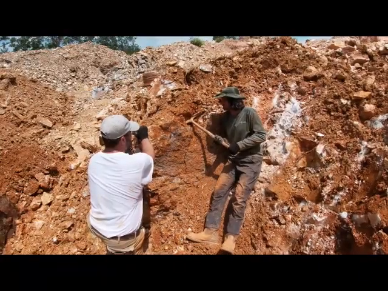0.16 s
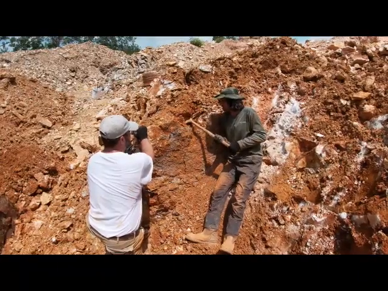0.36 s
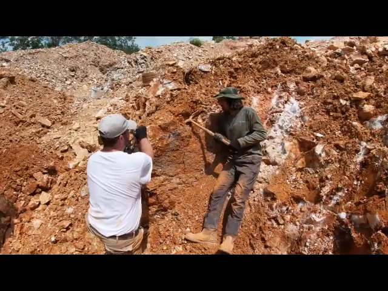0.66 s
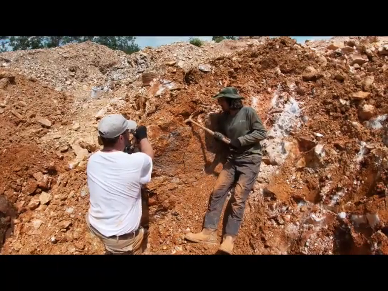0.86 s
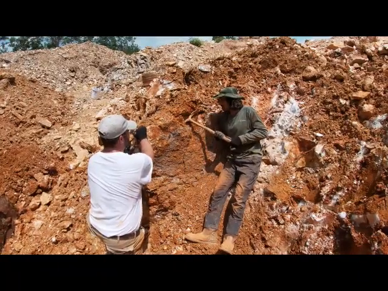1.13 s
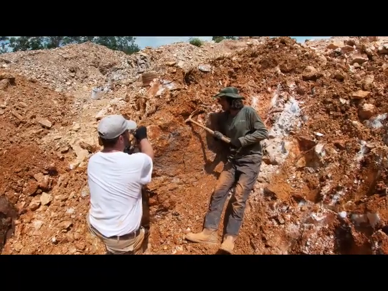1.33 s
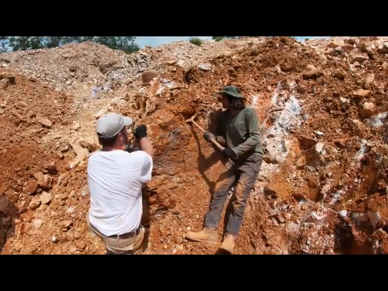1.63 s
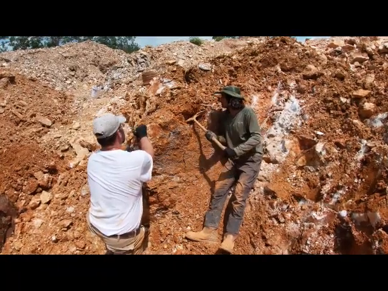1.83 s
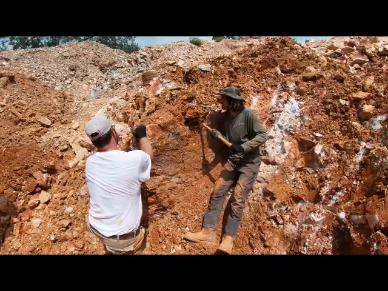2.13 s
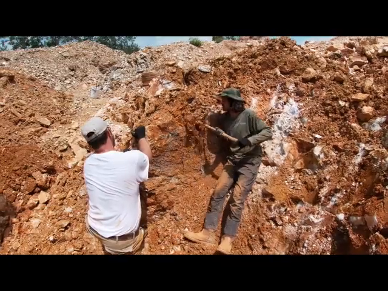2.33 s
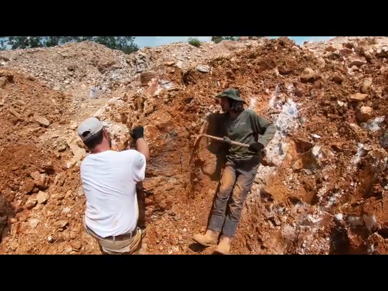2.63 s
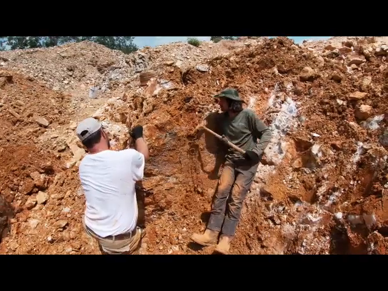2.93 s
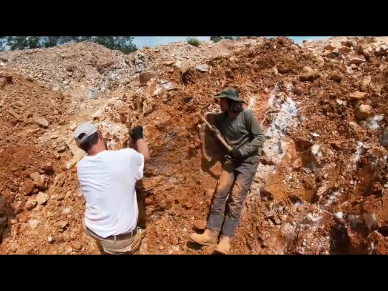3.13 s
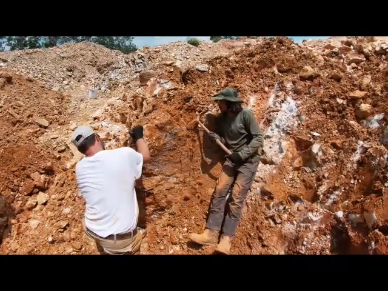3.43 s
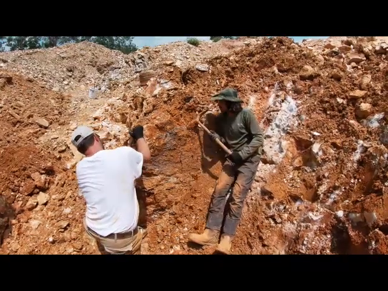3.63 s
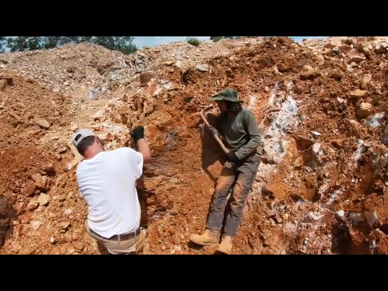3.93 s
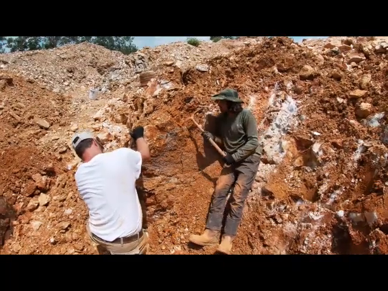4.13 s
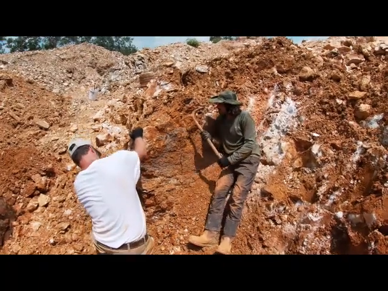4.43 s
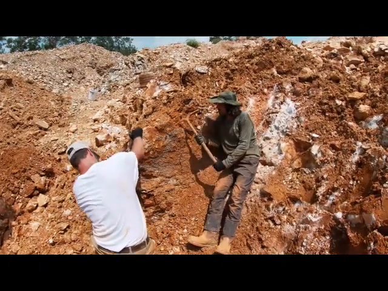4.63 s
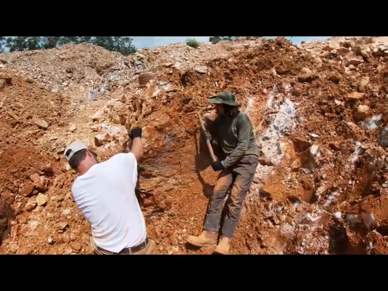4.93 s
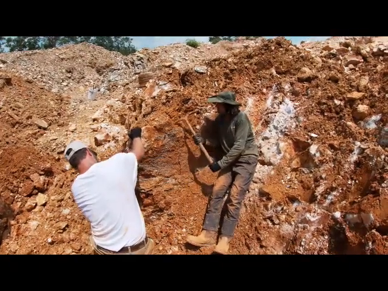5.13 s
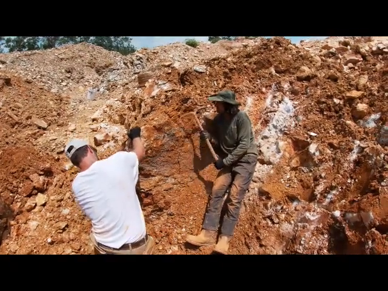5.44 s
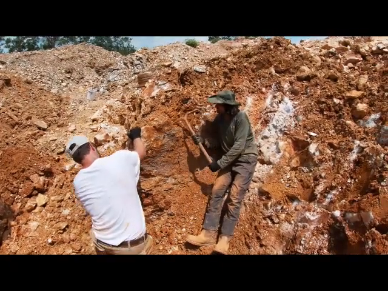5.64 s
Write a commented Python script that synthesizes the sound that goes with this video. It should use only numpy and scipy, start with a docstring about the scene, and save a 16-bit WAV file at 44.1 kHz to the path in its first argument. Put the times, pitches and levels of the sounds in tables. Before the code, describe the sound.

Quiet crumbling and ticking earth gives way to gritty scraping and a handful of hard, crunchy pick blows on rock outdoors.

```python
"""Digging in an open pit

Two people work a bank of clay and rock, one microphone feeding both channels alike.
A hand pick pries and scrapes, clods and stone chips break off, crumbs trickle: banded, ringing grains.
Hammer blows bite the rock, some close together: a burst of fractures and a short swell at 230 Hz.
Rough walls scatter the tool sounds; behind lies a low outdoor rumble with a faint hum.
"""
import sys
import numpy as np
from scipy import signal
from scipy.fft import rfft, irfft
from scipy.io import wavfile

SR = 44100
rng = np.random.default_rng(int(sys.argv[2]) if len(sys.argv) > 2 else 0)


def wav_out(sig):
    """Save sig, one row per channel (or a flat mono array), as 16-bit PCM at SR to the path in sys.argv[1]."""
    wavfile.write(sys.argv[1], SR, np.round(np.clip(np.atleast_2d(sig).T, -1, 1) * 32767).astype(np.int16))


N = 255188
TIME = np.arange(N) / SR

# Levels are those before the struck body's colour, the scatter and the microphone.
# heavy blows: t/s, rise/s, bite length/s, knock level/dB, crunch level/dB, grit level/dB,
# thud level/dB, ring f/Hz, ring level/dB
BLOWS = [(1.9757, 0.00038, 0.0066, -36, -27, -44, -56, 580, -25),
         (2.4161, 0.00015, .0075, -34.5, -37.5, -39.5, -50, 3190, -32.5),
         (2.4385, 0.00067, 0.017, -38, -37.5, -41, -41, 2830, -37),
         (3.4167, 0.00047, 0.0048, -23, -23.5, -22.5, -27, 3450, -21.5),
         (3.985, 0.00022, 0.0057, -24, -23.5, -23.5, -21, 2800, -30),
         (4.021, .002, 0.0081, -25.5, -23, -34.5, -34.5, 1830, -26),
         (4.4568, 0.0075, 0.02, -35, -29.5, -30, -30, 3140, -38.5),
         (5, 0.0032, 0.0072, -35.5, -37.5, -37.5, -47, 4750, -36),
         (5.0094, 0.00024, 0.0069, -19, -20, -26, -18.5, 1750, -48),
         (5.0305, 0.0016, .013, -25, -25, -26.5, -23, 2000, -30),
         (5.593, 0.00041, 0.026, -25, -21, -25.5, -22.5, 1730, -35)]
# knock, crunch and grit of a blow: low f/Hz, high f/Hz
BLOW_BANDS = [(270, 820), (1050, 3450), (3500, 9560)]
# peaks and hollows of struck rock and tool: f/Hz, width/Hz, level/dB
STRUCK_BODY = [(444.5, 160, 0), (675, 62, -6), (882, 81, 0), (1060, 180, 5.5), (1345, 41, -1),
               (1704, 150, 5.5), (2070, 43, 2), (3650, 350, 0), (4820, 610, 2), (5310, 2200, 6.5),
               (6490, 1200, 1), (7800, 960, 4)]
# what tool and struck rock ring with: f/Hz, relative level/dB, t60/s
TOOL_MODES = [(906, -7.5, 0.045), (1054, -38, 0.059), (1640, -33.5, 0.049), (2295, -43, 0.13),
              (2485, -15.5, .11), (3030, -50, .05), (3670, -41.5, .07), (5300, -46, .09), (5320, -32, .1),
              (7500, -27.5, .1)]

# pulls of the pick through packed clay, the first a light levering:
# t/s, length/s, wooden groan level/dB, steel singing level/dB
PULLS = [(1.691, 0.4, -94, -60), (1.992, 0.044, -36, -39.5), (2.123, 0.097, -38.5, -46.5),
         (2.281, 0.042, -39, -45.5)]
# resonances of the dragged pick, handle and head: f/Hz, relative level/dB, t60/s
PICK_WOOD = [(382, -14, 0.055), (557, 7, 0.09), (607, 5, 0.038)]
PICK_STEEL = [(1272, -1, 0.092), (1616, 3.5, 0.089), (2620, -3, 0.065), (2710, -12, 0.017),
              (3550, -2.5, 0.045)]
PULL_ATTACK_S, PULL_RELEASE_T60_S = 0.025, 0.087
SLIPS_PER_S, SLIP_DB = 160, 2  # the pick catches and slips as it is pulled
RASP_BAND_HZ, RASP_DB = [1150, 3200], -18  # bare grit against the groan of the handle

# steel scrapes over stone: t/s, length/s, level/dB
SCRAPES = [(0.877, 0.01, -55), (0.952, 0.02, -49.5), (1.905, 0.008, -42), (1.931, 0.022, -38.5),
           (2.101, 0.0072, -43), (2.202, 0.014, -45), (2.231, 0.017, -45.5), (2.373, 0.0087, -44.5),
           (2.406, 0.0047, -37), (2.489, 0.0051, -43), (2.716, 0.029, -41), (2.761, 0.0083, -35.5),
           (2.865, .013, -53), (2.97, 0.015, -43), (3.536, .02, -48.5), (4.052, 0.0081, -40.5)]
# balance of a scrape, added to its level: knock, crunch, grit [level/dB]
SCRAPE_COLOUR_DB = [-7.5, 1.5, 0]
# the steel edge sings as it scrapes: f/Hz, level against the scrape/dB, t60/s
EDGE_MODES = [(3300, -9.5, 0.0039), (9200, -16, .006), (10100, -17, .006)]
# clods and stone chips break off or land:
# t/s, length/s, knock level/dB, dullness/dB lost from each band to the next (negative is bright)
CLODS_AND_CHIPS = [(0.054, 0.029, -42.5, 1), (0.167, 0.073, -50.5, -1), (0.263, 0.028, -46, 2.5),
                   (0.371, .009, -36, -2), (0.439, 0.015, -46, 14), (0.693, 0.0095, -50.5, 1),
                   (1.544, 0.023, -40, 10), (1.994, 0.035, -34.5, 2.5), (2.05, 0.037, -41, 2.5),
                   (2.175, 0.011, -33, 11), (2.266, .008, -38, 0.5), (2.275, 0.014, -31.5, 3),
                   (3.079, 0.0076, -39, 4), (3.1, 0.0041, -40.5, 1.5), (3.129, 0.037, -33.5, 8.5),
                   (3.275, 0.011, -46, 5), (3.359, .01, -61, -9.5), (3.49, .01, -41, -1),
                   (4.727, 0.028, -49, 5.5)]
# pebbles tick against rock: t/s, level/dB
PEBBLES = [(0.461, -44), (.605, -50), (.733, -45.5), (1.093, -44.5), (2.631, -42.5), (3.008, -48),
           (3.051, -46), (3.342, -48.5), (3.776, -48), (3.843, -47), (4.132, -39.5), (5.323, -54.5)]
PEBBLE_S, PEBBLE_COLOUR_DB = 0.0017, [-10.5, -3, 5]  # contact length; knock, crunch, grit
# knock, crunch and grit of small pieces: low f/Hz, high f/Hz
CRUMBLE_BANDS = [(200, 1005), (950, 2700), (3400, 9700)]
# how each kind of contact swells and dies: (rise in lengths, t60 in lengths, before a fixed tail)
SCRAPE_SHAPE, CLOD_SHAPE, PEBBLE_SHAPE = (0.28, 2.2), (0.23, 3.55), (0.09, 7.5)

# soft hollow bumps: t/s, length/s, start f/Hz, level/dB before the flutter
BUMPS = [(.069, 0.042, 233, -40.5), (.26, 0.031, 165, -48), (.45, 0.043, 177, -44), (1.315, .06, 325, -39),
         (2.835, 0.025, 249, -46.5), (3.327, 0.018, 185, -36.5), (4.611, 0.022, 370, -51.5),
         (4.745, .11, 228, -46.5)]
BUMP_SAG, BUMP_ROUGHNESS = 0.2, 0.88  # share of pitch lost over a bump's length; flutter depth

# uneven flow of dirt down the bank: t/s, level/dB
FLOW = [(0, -52), (0.22, -53.5), (0.5, -57), (0.68, -51), (0.82, -58), (0.98, -49), (1.09, -59.5),
        (1.125, -71), (1.22, -64), (1.43, -52.5), (1.68, -61), (1.85, -57), (2.07, -54), (2.16, -59),
        (2.5, -57), (2.85, -54.5), (3.28, -60), (3.58, -52.5), (3.76, -63.5), (4.1, -64.5), (4.3, -70.5),
        (4.75, -66.5), (5.4, -74.5), (5.79, -62.5)]
# spectra of sliding sand and tumbling crumbs: f/Hz, relative level/dB
SAND = [(700, -10.5), (1500, -1), (3500, -2), (5500, -2.5), (7800, -3), (8800, -6), (10000, -5),
        (11500, -13.5), (15000, -23)]
ROLLING = [(100, -2.5), (170, 9.5), (300, 9), (500, 0.5), (800, 7), (1500, -15), (3000, -31.5)]
SAND_DB, ROLLING_DB, GRAVEL_DB = 2.5, -1.5, -6.5  # sand, crumbs against flow; gravel against sand
# blows shake sand and crumbs loose, falling pieces and bumps shed crumbs:
# (dB against the event, rise s, t60 s)
SAND_AFTER_BLOW, CRUMBS_AFTER_BLOW = (-23.5, 0.03, 0.42), (-23.5, 0.02, 0.26)
CRUMBS_AFTER_FALL = (-7, 0.021, 0.34)

# what the rough walls of the pit throw back
SCATTER_DB, SCATTER_RISE_S, SCATTER_T60_S = -15, 0.005, 0.15
# spectrum of the outdoor rumble: f/Hz, relative level/dB
AIR = [(15, -3), (28, 5), (45, -13), (85, -12), (120, -19), (155, -12.5), (220, -15.5), (400, -31),
       (1000, -32.5), (5000, -53.5), (9000, -37.5), (12000, -69.5), (15000, -75)]
# colour of the microphone in its housing: f/Hz, width/Hz, level/dB
MICROPHONE = [(524, 33, 0), (805, 210, -3.5), (1660, 470, 2), (2060, 62, -2), (3900, 660, 1.5),
              (8420, 910, -4.5), (9300, 200, 4)]
CUTOFF_HZ = 15300


def blows():
    """The point crushes rock, the stone rings briefly, and the bank thuds as it stops the tool."""
    out = np.zeros(N)
    for s, rise_s, length, knock_db, crunch_db, grit_db, thud_db, ring_hz, ring_db in BLOWS:
        cracks = bite(length, rise_s, t60=0.045, chatter_db=12.0)
        # the faster the rise, the harder the opening crack of a square hit
        cracks[round(0.0003 * SR)] -= 5.7 * np.exp(-rise_s / 0.00022)
        sound = in_bands(cracks, BLOW_BANDS, [knock_db, crunch_db, grit_db], length)
        dust = at_level(butter(cracks, 10500, "high"), grit_db - 21.5, length)
        stone = at_level(ring(cracks, ring_hz, t60=0.0098), ring_db, length)
        since_stop = np.arange(len(sound)) / SR - length
        swell = 2 / (np.exp(-since_stop / 0.0016) + np.exp(since_stop / 0.0036))
        thud = from_db(thud_db) * swell * np.sin(2 * np.pi * 230 * since_stop)
        weight = at_level(butter(cracks, [120, 380], "band"), thud_db - 13, length)
        add(out, s, sound + dust + stone + thud + weight)
    return resonances(out, STRUCK_BODY)


def tool_ringing(strikes):
    """The blows set the modes of tool and struck rock ringing."""
    return sum(from_db(db - 31.5) * ring(strikes, hz, t60) for hz, db, t60 in TOOL_MODES)


def drag():
    """Grit rasps along the pulled pick and keeps handle and steel head sounding, in fits and starts."""
    rasp = grains(N, per_s=500, spread_db=3.0)
    wood = rms_one(sum(from_db(db) * ring(rasp, hz, t60) for hz, db, t60 in PICK_WOOD))
    steel = rms_one(sum(from_db(db) * ring(rasp, hz, t60) for hz, db, t60 in PICK_STEEL))
    grinding = wood + from_db(RASP_DB) * rms_one(butter(rasp, RASP_BAND_HZ, "band"))
    out = np.zeros(N)
    for s, length, wood_db, steel_db in PULLS:
        attack = np.clip((TIME - s) / PULL_ATTACK_S, 0, 1)
        release = from_db(-60 * np.clip((TIME - s - length) / PULL_RELEASE_T60_S, 0, 2))
        out += attack * release * (from_db(wood_db) * grinding + from_db(steel_db) * steel)
    return out * from_db(SLIP_DB * drift(per_s=SLIPS_PER_S))


def crumbles():
    """Scrapes crunch and sound the steel edge, clods and chips knock dull to bright, pebbles tick."""
    out = np.zeros(N)
    for s, length, db in SCRAPES:
        sound = crumble(length, db + np.array(SCRAPE_COLOUR_DB), SCRAPE_SHAPE)
        edge = 0
        for hz, mode_db, t60 in EDGE_MODES:
            singing = ring(butter(sound, 0.8 * hz, "high"), hz, t60)
            edge = edge + at_level(singing, db + mode_db, length)
        add(out, s, sound + edge)
    for s, length, db, dullness_db in CLODS_AND_CHIPS:
        levels_db = db - dullness_db * np.arange(len(CRUMBLE_BANDS))
        add(out, s, crumble(length, levels_db, CLOD_SHAPE))
    for s, db in PEBBLES:
        add(out, s, crumble(PEBBLE_S, db + np.array(PEBBLE_COLOUR_DB), PEBBLE_SHAPE))
    return out


def bumps():
    """Short, rough low tones that sink in pitch."""
    out = np.zeros(N)
    for s, length, hz, db in BUMPS:
        t = np.arange(SR // 4) / SR
        pitch_hz = np.interp(t, [0, length], [hz, hz * (1 - BUMP_SAG)])
        phase = 2 * np.pi * np.cumsum(pitch_hz) / SR
        age = t / (0.33 * length)
        add(out, s, from_db(db) * age * np.exp(1 - age) * np.sin(phase))
    return out * (1 + BUMP_ROUGHNESS * drift(per_s=240))


def trickle():
    """Sand and crumbs slide unevenly, more after blows and falls; bits of gravel tick among them."""
    flow_db = np.interp(TIME, *np.transpose(FLOW))
    surges = drift(per_s=110)
    struck = [(s, crunch_db) for s, _, _, _, crunch_db, *_ in BLOWS]
    fallen = [(s, db) for s, _, db, _ in CLODS_AND_CHIPS] + [(s, db) for s, _, _, db in BUMPS]
    # loose dirt adds to the flow as power
    sliding = np.sqrt(from_db(flow_db + SAND_DB) ** 2 + spill(struck, SAND_AFTER_BLOW))
    loose_crumbs = spill(struck, CRUMBS_AFTER_BLOW) + spill(fallen, CRUMBS_AFTER_FALL)
    tumbling = np.sqrt(from_db(flow_db + ROLLING_DB) ** 2 + loose_crumbs)

    sand = coloured(grains(N, per_s=12000, spread_db=3.5), SAND) * from_db(3.23 * drift(per_s=75))
    rolling = coloured(grains(N, per_s=1600, spread_db=1.0), ROLLING) * from_db(3.8 * surges)
    gravel_hz = np.geomspace(2900, 6400, 12)
    ticks = sum(ring(grains(N, per_s=34, spread_db=8.5), hz, t60=12 / hz) for hz in gravel_hz)
    ticks = rms_one(butter(ticks, 5800, "low", order=4)) * from_db(GRAVEL_DB + 2.2 * surges)
    return sliding * (sand + ticks) + tumbling * rolling


def pit(x):
    """A thin, short scatter from the rough walls around: a decaying burst of noise as echo."""
    t = TIME[:SR // 2]
    envelope = (1 - np.exp(-t / SCATTER_RISE_S)) * from_db(-60 * t / SCATTER_T60_S)
    scatter = rng.standard_normal(len(t)) * envelope
    scatter = butter(scatter / np.sqrt(np.sum(scatter ** 2)), [200, 9000], "band", order=1)
    return x + from_db(SCATTER_DB) * signal.fftconvolve(x, scatter)[:N]


def background():
    """Low outdoor rumble of shaped noise with a faint wavering hum of two tones."""
    hum = from_db(-57.5) * np.sin(2 * np.pi * 59.8 * TIME) * from_db(2.2 * drift(per_s=5))
    upper_hum = from_db(-66.0) * np.sin(2 * np.pi * 140.0 * TIME) * from_db(2 * drift(per_s=3.2))
    return from_db(-55) * coloured(rng.standard_normal(N), AIR) + hum + upper_hum


def bite(length, rise_s, t60, chatter_db):
    """Fractures follow densely while something bites, in stick-slip surges, then die out."""
    t = np.arange(SR // 6) / SR
    envelope = (1 - np.exp(-t / rise_s)) * from_db(-60 * np.maximum(t - length / 2, 0) / t60)
    slips = from_db(-chatter_db * (t * 242 % 1))  # 242 slips per second
    return grains(len(t), per_s=8300, spread_db=3.0) * envelope * slips


def crumble(length, levels_db, shape):
    """A short contact opens with a tick, a long one swells; each has its own resonances and weight."""
    rise, tail = shape
    own_hz = np.exp(rng.uniform(np.log([1200, 2400, 4200]), np.log([2400, 4200, 7000])))
    cracks = bite(length, rise_s=rise * length, t60=0.017 + tail * length, chatter_db=2.0)
    cracks[round(0.0006 * SR)] += 9.2 * np.exp(-length / 0.0046)
    cracks = resonances(cracks, [(hz, hz / 11, 7.0) for hz in own_hz])
    weight = at_level(butter(cracks, [95, 175], "band"), levels_db[0] - 12.5, length)
    dust = at_level(butter(cracks, [8600, 11500], "band"), levels_db[2] - 12.5, length)
    return in_bands(cracks, CRUMBLE_BANDS, levels_db, length) + weight + dust


def spill(starts, rule):
    """Power of the loose dirt that events (s, dB) set going: it gathers, then runs out."""
    share_db, rise_s, t60 = rule
    power = np.zeros(N)
    t = TIME[:SR]
    for s, db in starts:
        amount = from_db(db + share_db - 60 * t / t60) * (1 - np.exp(-t / rise_s))
        add(power, s, amount ** 2)
    return power


def grains(n, per_s, spread_db):
    """Tiny fractures at random moments, many weak and a few strong."""
    sizes = from_db(spread_db * np.minimum(rng.exponential(1, n), 4))
    return (rng.random(n) < per_s / SR) * sizes * rng.choice([-1, 1], n)


def in_bands(cracks, bands_hz, levels_db, length):
    """Fractures heard in several bands, each at its own level."""
    return sum(at_level(butter(cracks, edges, "band", order=3), db, length)
               for edges, db in zip(bands_hz, levels_db))


def at_level(burst, db, length):
    """Scale a burst to the energy of this rms level held for its length and 1.5 ms more."""
    return from_db(db) * burst * np.sqrt((length + 0.0015) * SR / (np.sum(burst ** 2) + 1e-20))


def ring(x, hz, t60):
    """A unit click sets a decaying sine of height 1 ringing."""
    r, w = from_db(-60 / (t60 * SR)), 2 * np.pi * hz / SR
    return signal.lfilter([0, np.sin(w)], [1, -2 * r * np.cos(w), r * r], x + 1e-18)


def resonances(x, peaks):
    """A chain of peaks and dips."""
    for hz, width_hz, db in peaks:
        w, gain = 2 * np.pi * hz / SR, from_db(db / 2)
        k = np.sin(w) * width_hz / (2 * hz)
        zeros = [1 + k * gain, -2 * np.cos(w), 1 - k * gain]
        poles = [1 + k / gain, -2 * np.cos(w), 1 - k / gain]
        x = signal.lfilter(zeros, poles, x + 1e-18)
    return x


def coloured(x, spectrum):
    """Give a steady sound a spectrum; rms 1."""
    hz, db = np.transpose(spectrum)
    log_hz = np.log(np.maximum(np.fft.rfftfreq(N, 1 / SR), 1))
    return rms_one(irfft(rfft(x) * from_db(np.interp(log_hz, np.log(hz), db)), N))


def drift(per_s):
    """Random values joined by straight lines."""
    return np.interp(TIME * per_s, np.arange(4000), rng.standard_normal(4000))


def butter(x, hz, kind, order=2):
    """Pass one part of the spectrum."""
    return signal.sosfilt(signal.butter(order, hz, kind, fs=SR, output="sos"), x)


def from_db(db):
    """Amplitude factor of a level in dB."""
    return 10 ** (np.asarray(db) / 20)


def rms_one(x):
    """Scale a sound to rms 1."""
    return x / np.sqrt(np.mean(x ** 2) + 1e-20)


def add(track, s, sound):
    """Mix a sound into a track at time s."""
    start = max(round(s * SR), 0)
    track[start:start + len(sound)] += sound[:max(N - start, 0)]


def scene():
    """Tools and falling pieces within the pit walls, then the trickle and the outdoors."""
    strikes = blows()
    digging = strikes + tool_ringing(strikes) + crumbles() + drag() + bumps()
    mono = pit(digging) + trickle() + background()
    return np.array([mono, mono])


def record(dry):
    """The microphone colours the sound and dulls the treble; the top is cut steeply."""
    heard = resonances(dry, MICROPHONE + [(12240, 14700, -10.5)])
    return signal.sosfilt(signal.ellip(10, 0.1, 90, CUTOFF_HZ, fs=SR, output="sos"), heard)


dry = scene()
out = record(dry)
wav_out(out)
```